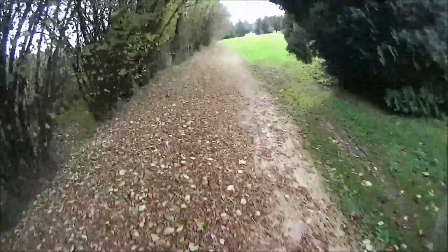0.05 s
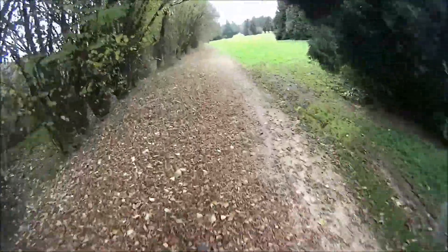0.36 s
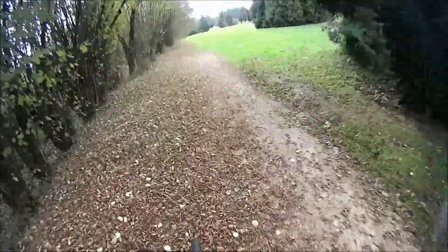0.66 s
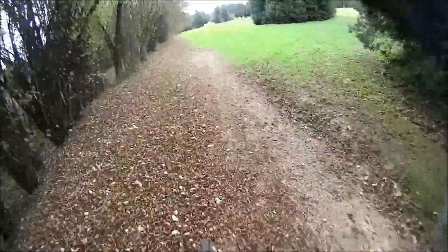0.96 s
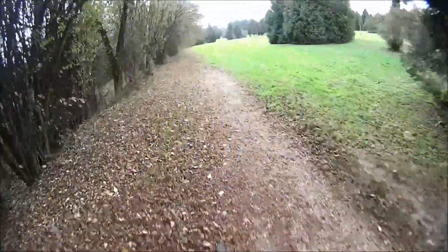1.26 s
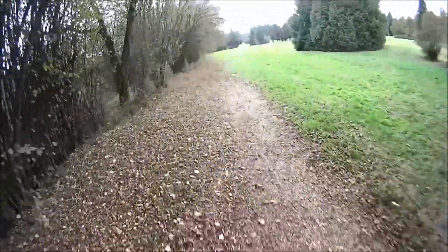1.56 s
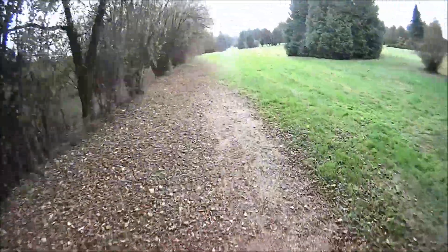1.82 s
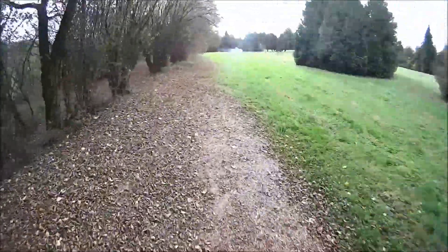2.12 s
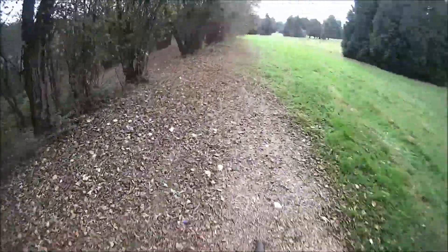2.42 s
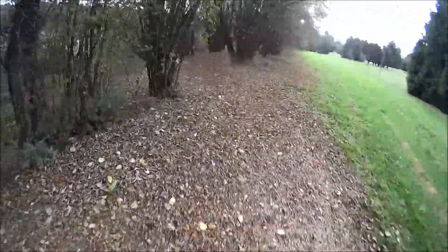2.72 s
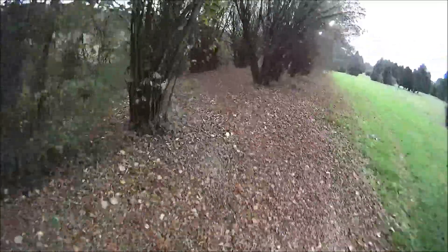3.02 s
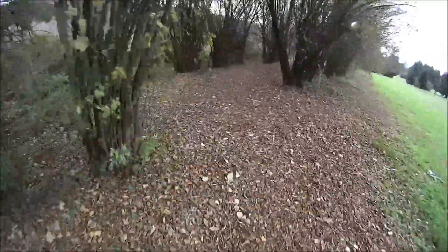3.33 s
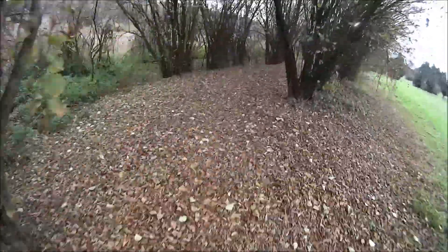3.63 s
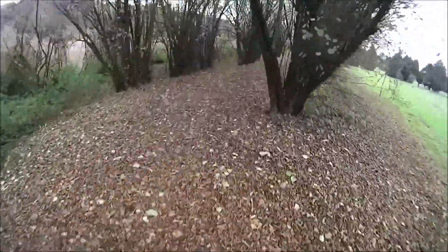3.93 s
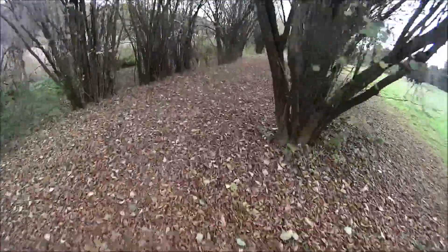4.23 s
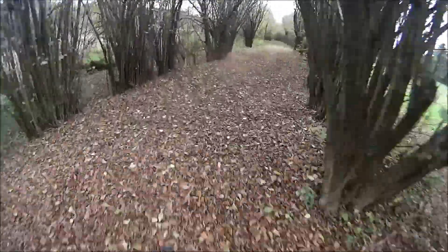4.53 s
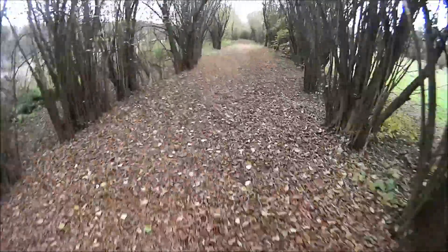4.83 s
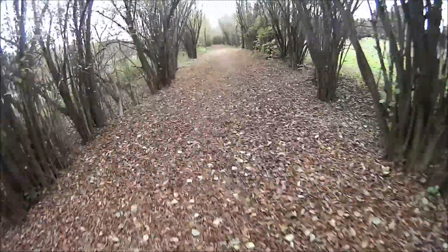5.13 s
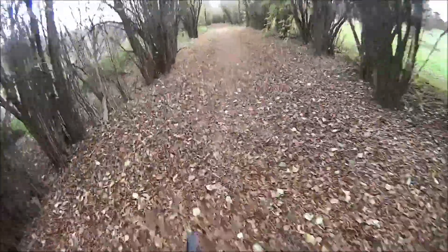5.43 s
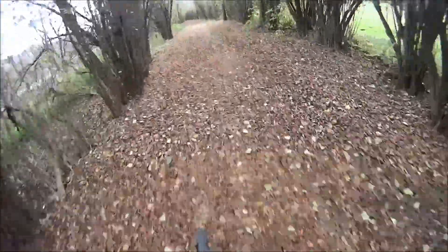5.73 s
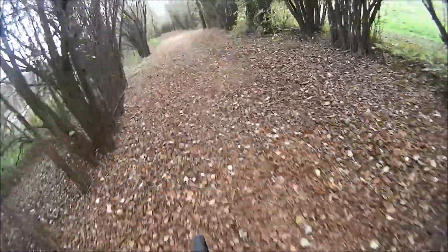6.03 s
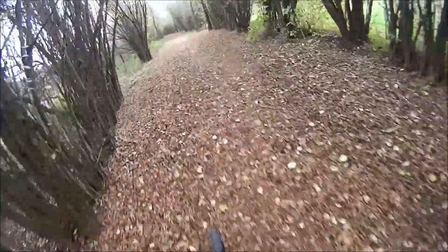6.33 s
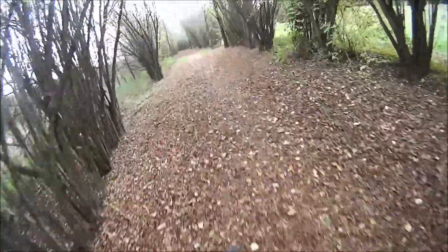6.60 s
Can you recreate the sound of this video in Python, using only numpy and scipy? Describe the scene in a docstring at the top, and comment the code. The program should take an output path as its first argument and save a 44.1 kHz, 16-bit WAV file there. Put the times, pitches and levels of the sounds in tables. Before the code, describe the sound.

Dry leaves crackle and rustle under a rolling bicycle, dotted with sharp clicks over a faint low tyre drone.

```python
"""Dry leaves crunch and tick under a bicycle on a park trail, heard from a camera carried on the ride.
The tyres crush the leaves in clumps of tiny brittle fractures, and sharp impacts excite the damped
modes of the camera's case. Rough ground brings short scraping swishes and soft thumps.
Tyre drone, a little wind and one faint, sinking whirr lie underneath."""
import sys
import numpy as np
from scipy import signal
from scipy.fft import rfft, irfft, next_fast_len
from scipy.io import wavfile

SR = 44100
rng = np.random.default_rng(int(sys.argv[2]) if len(sys.argv) > 2 else 0)


def dump(signal):
    """Clip the signal to [-1, 1] and save it as 16-bit WAV at the path in sys.argv[1]."""
    limited = np.clip(np.atleast_2d(signal).T, -1, 1)
    pcm = np.round(limited * 32767).astype(np.int16)
    wavfile.write(sys.argv[1], SR, pcm)


N = 293706
TIME = np.arange(N) / SR
SIZE = next_fast_len(N + 8192, True)
FREQS = np.arange(SIZE // 2 + 1) * SR / SIZE
CASE_HZ = 2650   # nominal ring frequency of the case

# Levels in all tables are relative; each source adds its own gain.
# loud ticks: t/s, level/dB, nominal ring f/Hz, treble re tick/dB, left minus right/dB
TICKS = [(0.0279, -8, 2580, -21, 3), (0.216, -5, 2480, -22, 0), (0.269, -9, 2090, -34, 1),
         (0.3295, -10, 2580, -15, -2.5), (0.5848, -9.5, 2640, -18, 0), (0.6782, -4, 2610, -24.5, 1),
         (0.7044, -3.5, 2620, -29, -0.5), (0.7463, -10, 2570, -18.5, -1.0), (0.7841, -8.5, 2460, -25, 0.0),
         (0.8375, -13.5, 2450, -16.5, 2), (1.0354, -15.5, 2900, -23, -0.5),
         (1.1596, -6.5, 2750, -21.5, -1.5), (1.1874, -8, 2640, -17, -1), (1.237, -14, 2700, -14, -8),
         (1.2778, -2.5, 2590, -39.5, -1), (1.3106, -20.5, 2650, -9, -2.0), (1.3442, -13.5, 2550, -15.5, 2),
         (1.5085, -9.5, 2610, -18, -4), (1.5695, -13.5, 2760, -23, -10), (1.591, -7.5, 2200, -24, 1),
         (1.699, -7, 2760, -42, -11), (1.8562, -24.5, 2650, -0.5, -2.5), (1.9144, -12.5, 2200, -10, 2),
         (1.9212, -6.5, 2550, -16, -5.0), (1.9622, -14.5, 2500, -14, 0), (2.3376, -13.5, 2640, -16, 0),
         (2.358, -11.5, 2380, -17, -3), (2.4657, -13, 2670, -20.5, -6), (2.6384, -12, 2800, -27, -3.5),
         (2.8067, -8, 2660, -28, -7), (3.056, -14.5, 2650, -24.5, -6.5), (3.3377, -17, 2790, -19.5, -11),
         (3.5606, -13.5, 2660, -27.5, -1.5), (3.6393, -16.5, 2640, -20, -4), (4.1615, -11, 2320, -29, 3),
         (4.765, -13.5, 2650, -14.5, 11), (4.899, -18.5, 2730, -5.5, 4), (5.0057, -10.5, 2840, -22, -3.5),
         (5.1304, -12, 2870, -10, 3), (5.3457, -19, 2730, -7, -2.0), (5.4358, -21, 3230, -1, -0.5),
         (5.46, -5, 2730, -20, -1), (5.7787, -11.5, 2700, -13, -1), (6.0142, -9, 2960, -19, -2.0),
         (6.0365, -6, 2570, -11, -2.0), (6.0574, -12, 2780, -15, -2.5), (6.0704, -7.5, 3010, -12.5, 5),
         (6.2345, -12.5, 2670, -20, -10), (6.2861, -21, 2840, -26, -11), (6.6109, -9, 2560, -40, -1.5)]
# depth of leaf litter: t/s, share of the tyres' power that is dull rumble (0-1)
LITTER = [(0, 0.13), (3.6, 0.06), (3.9, 0.84), (4.7, 0.86), (4.95, 0.09), (6.66, 0)]


def leaves(crunch_db, crisp_db):
    """Brittle fracture: leaves collapse in clumps of cracks, over the rustle of many small ones."""
    spectrum = [(200, -33.5), (690, -23.5), (830, -11.5), (1030, -6), (1400, -3), (1920, -7), (2380, -5.5),
                (2680, -0.5), (2950, -5), (3400, -8.5), (4100, -14), (4750, -11.5), (5150, -9.5),
                (6300, -17), (8200, -18.5), (10300, -28), (11000, -34.5)]   # crushed leaves: f/Hz, level/dB
    clump = from_db(2.3 * drift(rate=40))
    grains = rms_one(clump * cracks(per_s=900 * clump, size_db=3.5, decay_s=0.0007))
    rustle = from_db(-0.5) * np.sqrt(clump) * rng.standard_normal((2, N))
    crush = colour(grains + rustle, spectrum)
    # brittle leaves add bright splinters of their own
    splinters = from_db(-4) * colour(cracks(per_s=260 * clump, size_db=5.5, decay_s=0.00056), spectrum)
    treble = signal.butter(3, 3800, "high", fs=SR, output="sos")
    crisp, splinters = signal.sosfiltfilt(treble, np.stack([crush, splinters]))
    brittle_db = 0.98 * drift(rate=18)
    lows = from_db(crunch_db - 2) * rms_one(crush - crisp)
    highs = from_db(crisp_db + brittle_db - 1) * rms_one(crisp + splinters)
    return lows + highs


def cracks(per_s, size_db, decay_s):
    """Shot noise: random fractures, mostly tiny, each a burst whose energy decays exponentially."""
    born = rng.random(N) < per_s / SR
    energy = born * from_db(size_db * np.minimum(rng.exponential(1, N), 4.5)) ** 2
    dying = signal.lfilter([1], [1, -np.exp(-1 / (decay_s * SR))], energy + 1e-18)
    return rms_one(np.sqrt(dying) * rng.standard_normal((2, N)))


def swells(width_s=0.0069, lag_s=0.003):
    """Amplitude envelope: a Gaussian bump of height one at each loud tick, as the leaf gives way."""
    bumps = np.zeros(N)
    away = np.linspace(-3, 3, round(6 * width_s * SR))
    for s, *_ in TICKS:
        add(bumps, s + lag_s - len(away) / 2 / SR, np.exp(-away ** 2))
    return np.minimum(bumps, 1)


def with_body(crunch, corner_hz=1020):
    """Shelving filter: a varying gain below the corner thins or fills the crunch."""
    body = [(0, 5), (0.7, -10), (1.25, -13), (2.1, 1), (3.1, 2), (4.4, 4), (5.2, 4.5), (6.66, -3.5)]   # low mids of the crunch: t/s, gain/dB
    low = signal.sosfiltfilt(signal.butter(4, corner_hz, fs=SR, output="sos"), crunch)
    return crunch + (from_db(in_time(body)[0]) - 1) * low


def ticks(rows, contact_s=0.00035, crack_s=0.0014, crumble_s=0.009, bounce_db=-14):
    """Modal ringing: a hard contact strikes the case and bounces once, with a bright crack and crumbs."""
    case_modes = [(1127, -31.5, 0.025), (1510, -36.5, 0.034), (2300, -26, 0.012), (2690, -12, 0.0085),
                  (2798, -36.5, 0.009), (5370, -59, 0.0046)]   # resonances of the case: f/Hz, level/dB, T60/s
    crack_spectrum = [(700, -45), (1200, -17), (3000, 21), (4000, 6), (5200, 10.5), (6500, 3), (8300, 2.5),
                      (11000, -14)]   # the bright crack: f/Hz, level/dB
    rings, snaps = np.zeros((2, N)), np.zeros((2, N))
    t = TIME[:SR // 25]
    onset = 1 - np.exp(-(t / contact_s) ** 2)
    mode_hz, mode_db, t60 = np.transpose(case_modes)[:, :, None]
    for s, level_db, hz, treble_db, pan_db in rows:
        sides = from_db(np.array([[1], [-1]]) * pan_db / 2)
        strength = from_db(mode_db + rng.normal(0, 1, mode_db.shape))
        pitch = mode_hz * hz / CASE_HZ * (1 + 0.018 * rng.standard_normal(mode_hz.shape))
        port_phase = rng.normal(0, 0.51, (2, len(case_modes), 1))
        modes = strength * from_db(-60 * t / t60) * np.sin(2 * np.pi * pitch * t + port_phase)
        ring = sides * from_db(level_db + 14) * modes.sum(axis=1) * onset
        add(rings, s, ring)
        add(rings, s + rng.uniform(0.00201, 0.0052), from_db(bounce_db) * ring)
        crumbs = from_db(-13 + 4.8 * rng.standard_normal(len(t))) * np.exp(-t / crumble_s)
        snap = (np.exp(-t / crack_s) + crumbs) * rng.standard_normal((2, len(t)))
        add(snaps, s, from_db(level_db + treble_db + 4.5) * snap)
    # the small case radiates nothing below its lowest mode
    radiation = signal.butter(5, 950, "high", fs=SR, output="sos")
    return signal.sosfilt(radiation, rings + ports(colour(snaps, crack_spectrum)))


def lesser_ticks(crunch_db, per_s=9):
    """Poisson process: chance ticks, denser and louder as the crunch grows, in rows like TICKS."""
    born = np.flatnonzero(rng.random(N) < per_s * from_db(crunch_db - crunch_db.mean()) / SR)
    size, pitch, bright, side = rng.standard_normal((len(born), 4)).clip(-1.5, 1.5).T
    level_db = crunch_db[born] + 12.5 + 2 * size
    treble_db = -13 + 2 * bright
    return np.transpose([born / SR, level_db, CASE_HZ + 130 * pitch, treble_db, 1.5 * side])


def patter(crunch_db, per_s=30, size_db=3, band_hz=(2400, 3050)):
    """Impulse response: many faint hits ring the main mode of the case."""
    hits = (rng.random(N) < per_s / SR) * from_db(size_db * rng.standard_normal(N).clip(-1.5, 1.5))
    pair = hits * rng.choice([-1, 1], (2, N)) + 1e-18
    rings = signal.sosfilt(signal.butter(2, band_hz, "band", fs=SR, output="sos"), pair)
    return from_db(crunch_db - 8) * rms_one(rings)


def swishes(steepness=4.9):
    """Sliding friction: dense slips swell and stop; deep litter keeps up a faint, uneven rubbing."""
    rubs = [(0.091, 0.033, -24.5), (0.407, 0.049, -22), (0.51, 0.041, -17), (1.607, 0.039, -25),
            (1.658, 0.054, -19), (3.272, 0.011, -28.5), (3.83, 0.015, -33), (3.913, 0.036, -27.5),
            (4.179, 0.037, -21.5), (4.256, 0.089, -23), (4.378, 0.044, -20.5), (4.464, 0.062, -21),
            (4.621, 0.04, -24), (5.123, 0.016, -23), (5.574, 0.05, -20.5), (5.661, 0.071, -18.5)]   # brief scrapes: middle t/s, length/s, level/dB
    spectrum = [(120, -27), (200, -12.5), (344, -18), (655, -12.5), (1230, -6.5), (1610, 1.5), (2330, 3),
                (2750, -12), (3390, -15), (4380, -18), (5180, -9), (6040, -11), (8060, -20.5), (9380, -39),
                (10600, -26.5), (11500, -47), (15000, -75)]   # friction noise: f/Hz, level/dB
    power = in_time(LITTER)[0] ** 2 * from_db(-35 - 0.5 * drift(rate=4)) ** 2
    for s, length, db in rubs:
        away = np.abs(np.linspace(-2, 2, round(2 * length * SR)))   # from the middle, in half lengths
        add(power, s - length, from_db(db) ** 2 * np.exp(-away ** steepness))
    slips = cracks(per_s=4500, size_db=4.5, decay_s=0.001)
    return from_db(-0.68) * np.sqrt(power) * rms_one(colour(slips, spectrum))


def thumps(knock_s=0.0083, jolt_s=0.013):
    """Shock excitation: bumps give the frame a quick dull knock and a slower, deeper jolt."""
    bumps = [(0.021, -48, -35), (0.249, -41, -47), (0.516, -33.5, -55), (0.631, -48, -43.5),
             (0.739, -58, -43), (1.674, -35, -52), (3.263, -32, -52), (3.827, -32, -52),
             (4.691, -39.5, -33.5), (5.118, -46, -39), (5.662, -29, -41)]   # bumps in the trail: t/s, knock level/dB, jolt level/dB
    knock_spectrum = [(100, -14.5), (220, -6), (410, -5), (600, -12.5), (1200, -12.5), (3000, -66)]   # dull knock: f/Hz, level/dB
    jolt_spectrum = [(50, -40), (105, 10), (150, 2), (230, 6), (500, -57)]   # deep shake: f/Hz, level/dB
    knocks, jolts = np.zeros((2, N)), np.zeros((2, N))
    t = TIME[:SR // 6]
    for s, knock_db, jolt_db in bumps:
        push = rng.standard_normal((2, len(t)))
        add(knocks, s, from_db(knock_db) * t / knock_s * np.exp(1 - t / knock_s) * push)
        add(jolts, s, from_db(jolt_db) * t / jolt_s * np.exp(1 - t / jolt_s) * push)
    return colour(knocks, knock_spectrum) + colour(jolts, jolt_spectrum)


def tyres():
    """Structure-borne sound: the tread drones through the frame on firm ground and rumbles in litter."""
    roll = [(0, -44), (0.35, -50), (0.75, -49.5), (1.1, -52.5), (2.1, -50), (2.37, -46), (2.6, -51),
            (3.3, -50), (4.13, -39), (4.9, -46.5), (5.35, -45), (5.6, -44), (6.66, -46)]   # rolling noise: t/s, level/dB
    firm_spectrum = [(45, -9), (75, -6.5), (98, 4.5), (122, -15.5), (165, -13.5), (197, -1.5), (235, -11),
                     (400, -12.5), (560, -15), (720, -13.5), (1200, -42.5)]   # tread on firm ground: f/Hz, level/dB
    soft_spectrum = [(70, -25), (125, 3.5), (170, 0), (260, -4), (450, -15.5), (900, -42)]   # tread in deep litter: f/Hz, level/dB
    litter, = in_time(LITTER)
    firm = rms_one(colour(rng.standard_normal((2, N)), firm_spectrum))
    soft = rms_one(colour(rng.standard_normal((2, N)), soft_spectrum))
    gain = from_db(in_time(roll)[0] + 3.34 + 1.02 * drift(rate=21))
    return gain * (np.sqrt(1 - litter) * firm + np.sqrt(litter) * soft)


def wind(gust_db=2):
    """Turbulent pressure: air buffets the camera in gusts."""
    breeze = [(0, -44), (1.2, -46.5), (1.7, -43.5), (2.35, -44), (2.7, -47.5), (3.7, -43.5), (4.4, -45.5),
              (5.2, -39), (5.8, -39.5), (6.35, -50.5)]   # air against the camera: t/s, level/dB
    spectrum = [(10, -6.5), (24, 4.5), (38, -8), (60, -9), (120, -55), (300, -72)]   # buffeting: f/Hz, level/dB
    gain = from_db(in_time(breeze)[0] + 2.5 + gust_db * drift(rate=3.1))
    return gain * rms_one(colour(rng.standard_normal((2, N)), spectrum))


def whirr(flutter_hz=28, upper_db=-4, upper_ratio=1.125):
    """Narrow-band noise: two randomly modulated tones glide down together."""
    glide = [(.6, 1560, -50), (.75, 1480, -40), (.9, 1455, -35), (1.07, 1445, -34), (1.14, 1320, -48),
             (1.35, 1290, -48)]   # faint whirr: t/s, lower tone f/Hz, level/dB
    hz, level_db = in_time(glide)
    phase = 2 * np.pi * np.cumsum(hz) / SR
    smoothing = signal.butter(2, flutter_hz, fs=SR, output="sos")
    flutter = signal.sosfilt(smoothing, rng.standard_normal((2, 2, N)))
    lower = flutter[0] * np.sin(phase)
    upper = from_db(upper_db) * flutter[1] * np.sin(upper_ratio * phase)
    return from_db(level_db) * rms_one(lower + upper)


def ports(pair):
    """Partial coherence: mid and side reach two microphone ports, shifted by the case in phase and level."""
    lead = [(25, 0), (70, .2), (200, .6), (450, 1.5), (700, 2.1), (1000, 1.0), (1400, .6), (2000, .7),
            (2650, -.4), (3100, .45), (5500, .05), (11000, 0)]   # phase between the ports: f/Hz, left lead/rad
    balance = [(60, -1), (250, -1), (600, 1), (1200, 2.5), (2100, 1.5), (2800, -4.5), (3400, -.5),
               (5000, -.5), (7000, -1), (11000, -0.5)]   # level between the ports: f/Hz, left minus right/dB
    spread = [(40, -40), (130, -18), (300, -7.5), (700, -4.5), (1300, -7), (2200, -17.5), (2700, -5),
              (3500, -11.5), (6500, -6.5), (11000, -9.5)]   # unshared sound: f/Hz, side gain/dB
    mid, side = rfft(pair, SIZE)
    sign = np.array([[1], [-1]])
    shift = from_db(sign * at_hz(balance) / 2) * np.exp(.5j * sign * at_hz(lead))
    return irfft((mid + sign * from_db(at_hz(spread)) * side) * shift, SIZE)[:, :N]


def colour(x, spectrum):
    """Minimum-phase filter: folding the cepstrum makes the spectrum causal, at unit power gain."""
    cepstrum = irfft(np.log(rms_one(from_db(at_hz(spectrum)))), SIZE)
    cepstrum[1:SIZE // 2] *= 2
    cepstrum[SIZE // 2 + 1:] = 0
    return irfft(rfft(x, SIZE) * np.exp(rfft(cepstrum)), SIZE)[..., :N]


def drift(rate):
    """Random modulation: noise low-passed at rate/Hz, with a spread of about one."""
    pole = np.exp(-40 * np.pi * rate / SR)   # one step per 20 samples
    slow = signal.lfilter([1], [1, -2 * pole, pole * pole], rng.standard_normal(N // 20 + 4002))[4000:]
    return np.interp(np.arange(N) / 20, np.arange(len(slow)), np.clip(rms_one(slow), -2.3, 2.3))


def from_db(db):
    """Decibels to amplitude ratio."""
    return 10 ** (np.asarray(db) / 20)


def rms_one(x):
    """Normalisation to an rms of one."""
    return x / np.sqrt(np.mean(x ** 2) + 1e-20)


def in_time(rows):
    """Linear interpolation in time, one curve per column."""
    s, *columns = np.transpose(rows)
    return [np.interp(TIME, s, c) for c in columns]


def at_hz(points):
    """Interpolation on a log-frequency axis."""
    hz, value = np.transpose(points)
    return np.interp(np.log(FREQS + 1), np.log(hz), value)


def add(out, s, sound):
    """Superposition: mix a short sound in at time s."""
    i = max(0, round(s * SR))
    out[..., i:i + sound.shape[-1]] += sound[..., :max(0, N - i)]


def scene():
    """Superposition: trail, bicycle, wind and ticks sum at the two ports."""
    ride = [(0.0, -36, -40.5), (0.3, -33.5, -43), (0.63, -29.5, -37.5), (0.89, -28.5, -40.5),
            (1.28, -33, -40), (1.5, -33.5, -42.5), (1.65, -32, -46.5), (2.24, -34, -43), (2.59, -33.5, -45),
            (3.71, -34.5, -46), (4.32, -33.5, -44.5), (4.97, -33.5, -43), (5.36, -32, -39.5),
            (5.6, -28.5, -36), (5.79, -29.5, -39.5), (6.19, -26.5, -40), (6.51, -30, -39),
            (6.66, -26.5, -40.5)]   # leaves under the tyres: t/s, crunch level/dB, crisp treble level/dB
    crunch_db, crisp_db = in_time(ride)
    patches_db = 0.68 * drift(rate=20)   # the leaves lie in uneven patches
    crunch_db, crisp_db = crunch_db + patches_db, crisp_db + patches_db
    swell = swells()
    crunch = with_body(leaves(crunch_db + 3 * swell, crisp_db + 2.5 * swell))
    trail = crunch + patter(crunch_db) + swishes()
    bicycle = whirr() + thumps() + tyres()
    return ports(trail + bicycle + wind()) + ticks([*TICKS, *lesser_ticks(crunch_db)])


def record(dry, ceiling=0.8, cutoff_hz=11200):
    """Saturation and band limiting: the camera rounds the highest peaks and cuts the top steeply."""
    rounded = ceiling * np.tanh(dry / ceiling)
    return signal.sosfilt(signal.ellip(8, .3, 70, cutoff_hz, fs=SR, output="sos"), rounded)


dry = scene()
out = record(dry)
dump(out)
```